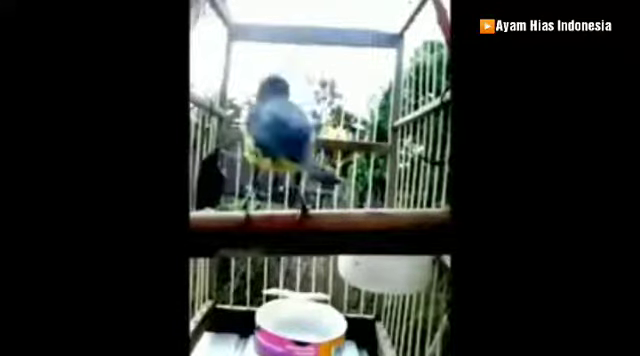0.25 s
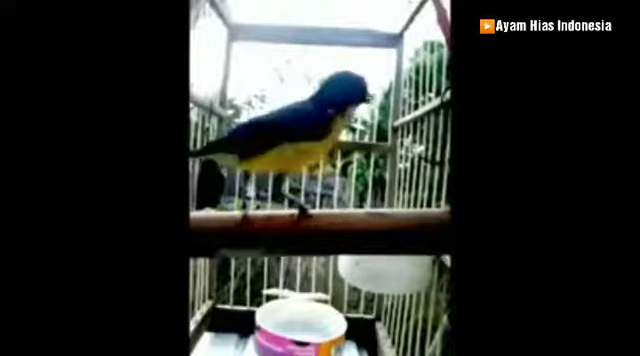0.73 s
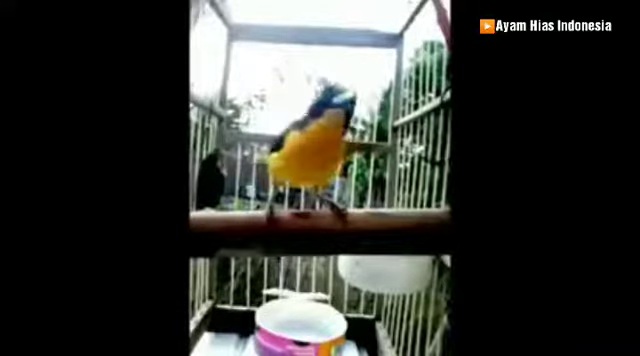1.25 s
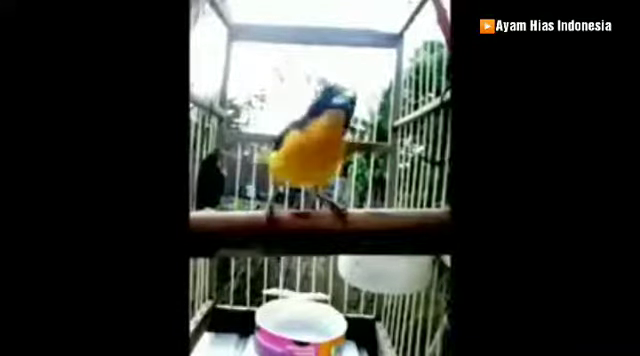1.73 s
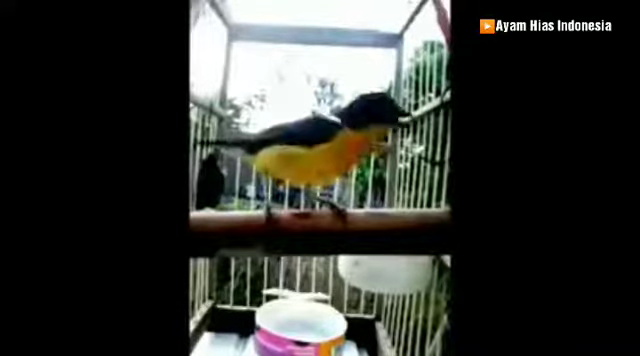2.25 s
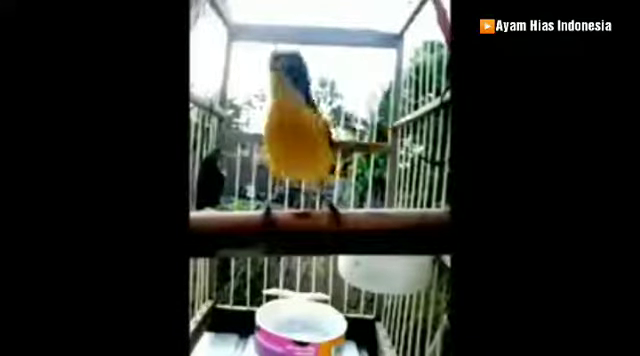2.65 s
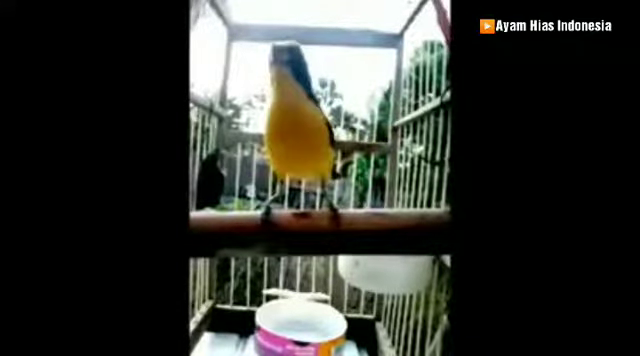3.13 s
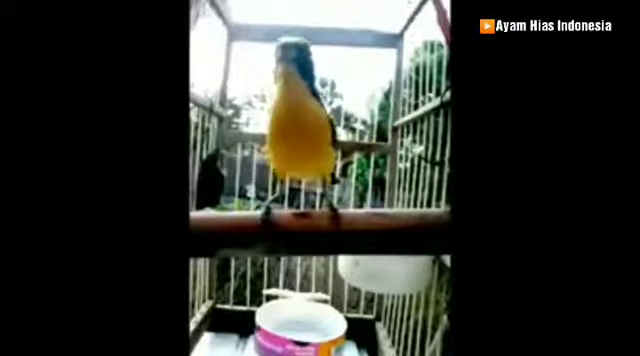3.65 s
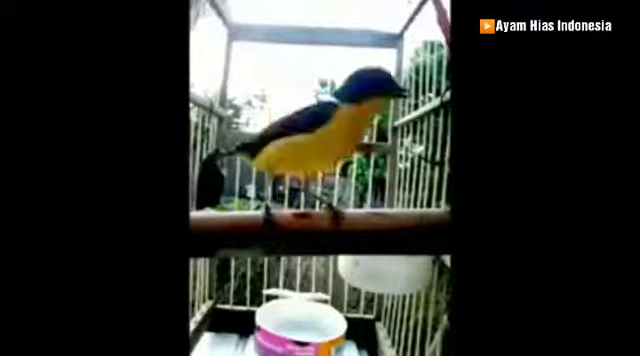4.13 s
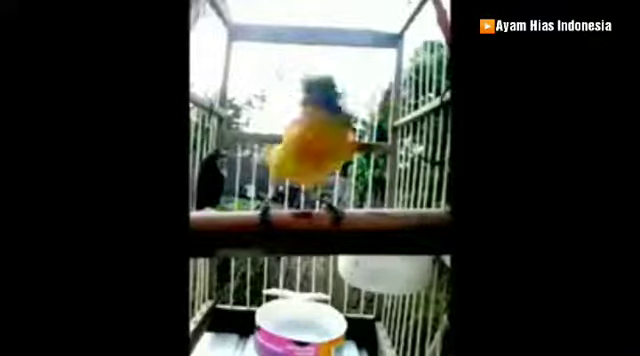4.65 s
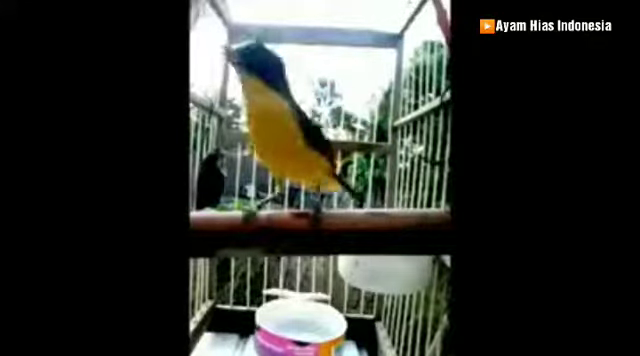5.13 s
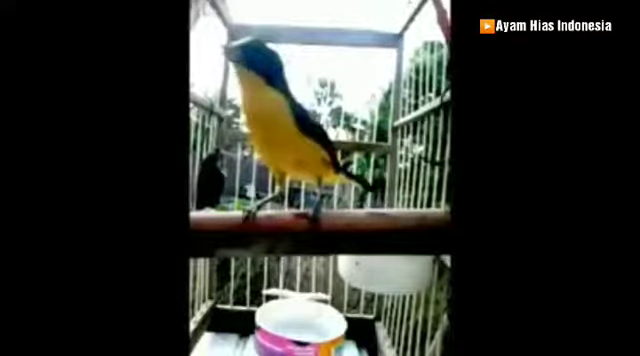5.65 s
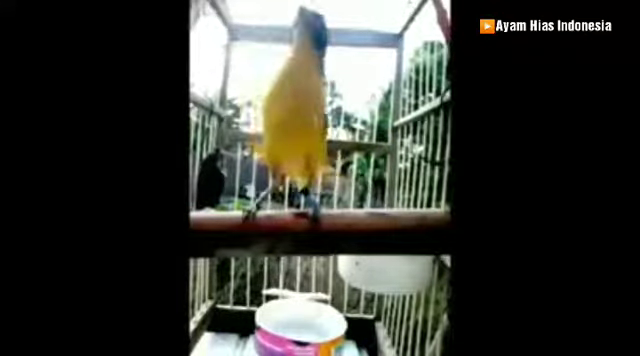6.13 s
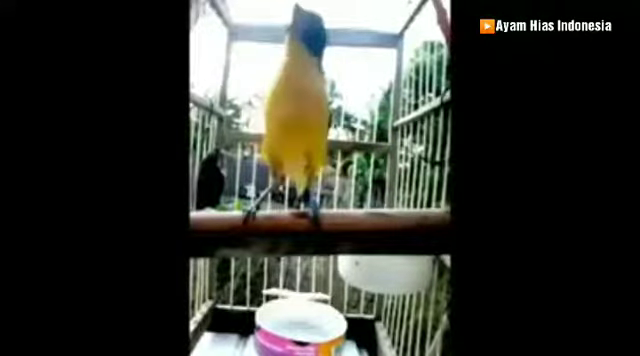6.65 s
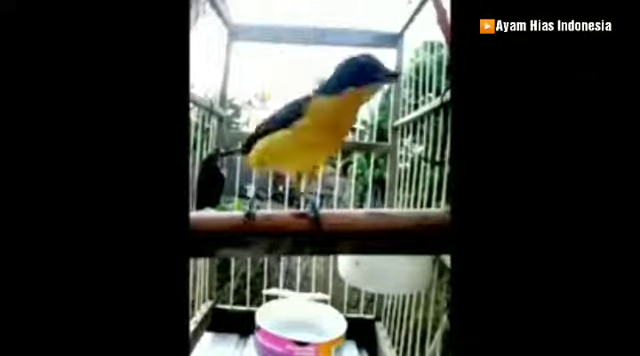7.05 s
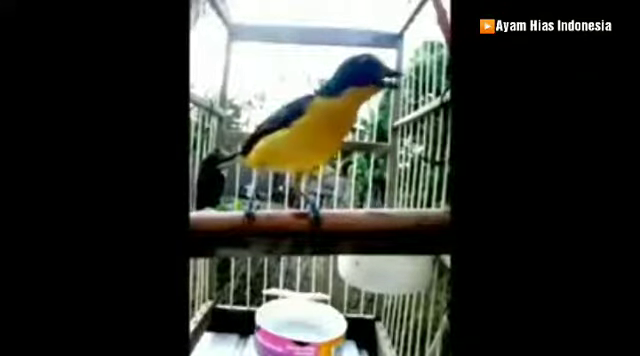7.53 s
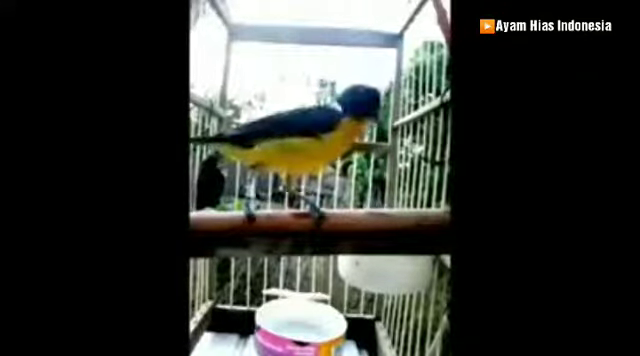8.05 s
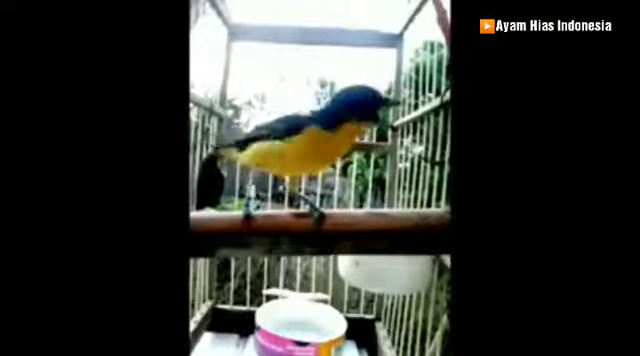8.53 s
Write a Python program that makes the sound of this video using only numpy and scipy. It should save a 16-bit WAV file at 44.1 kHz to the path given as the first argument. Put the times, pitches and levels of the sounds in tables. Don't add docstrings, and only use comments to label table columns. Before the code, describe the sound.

A caged songbird close by sings rapid whistles, arching calls, buzzes, darting peeps and a bright fast trill, distorting on the loudest notes.

```python
import sys
import numpy as np
from scipy import signal
from scipy.fft import rfft, irfft, next_fast_len
from scipy.io import wavfile
from scipy.ndimage import uniform_filter1d, minimum_filter1d

SR = 44100
rng = np.random.default_rng(int(sys.argv[2]) if len(sys.argv) > 2 else 0)


def master_out(mix):
    frames = np.transpose(np.atleast_2d(mix))
    ceiling = np.clip(frames, -1, 1)
    pcm = np.round(ceiling * 32767).astype(np.int16)
    wavfile.write(sys.argv[1], SR, pcm)


def gain_from_db(level_db):
    decades = np.asarray(level_db, float) / 20
    return 10 ** decades


N = 387198
FRAME = 1024

# (start [s], length [s], top pitch [Hz], level [dB])
DUETS = [
    (-.085, 0.11, 6300, -7.5),
    (.118, 0.095, 6250, -9),
    (0.325, .1, 5980, -8),
    (0.465, 0.083, 5850, -7.5),
]
# (share of length, pitch [Hz], level re duet [dB])
DUET_UPPER = [(.35, 5367, -3), (0.52, 5108, -6), (0.721, 5397, -0.5), (1.001, 5546, -10.5)]
# (share of length, pitch [Hz], level re duet [dB])
DUET_LOWER = [(.0, 3588, -23), (.08, 3737, -16), (0.351, 2880, -24), (0.649, 3494, -15.5),
              (1.001, 4420, -21)]
# (share of length, pitch [Hz], level re duet [dB])
DUET_BRANCH = [(0.302, 5760, -3.5), (0.599, 6314, -16)]


def duets():
    notes = []
    for s, length, top_hz, db in DUETS:
        leap = [(0, 5000, -11), (.16, top_hz, -.5)]
        for shape in ([*leap, *DUET_UPPER], DUET_LOWER, DUET_BRANCH):
            notes.append([(s + share * length, hz, db + d) for share, hz, d in shape])
    return [rows for rows in notes if rows[-1][0] > 0]


# (start [s], pitch [Hz], level [dB], dip [dB])
GRACES = [(4.727, 3890, -30.5, -38), (4.88, 3660, -23.5, -45), (5.016, 3890, -24, -36),
          (5.143, 3874, -21, -34.5), (5.297, 3726, -20.5, -25.5), (5.449, 3484, -24.5, -29.5),
          (5.607, 3615, -19.5, -21.5), (5.791, 3850, -22, -32.5), (5.97, 3555, -15.5, -29),
          (6.127, 3740, -20, -31), (6.369, 3532, -20.5, -22)]
# (time [s], pitch [Hz], level [dB])
FEET = [(4.772, 2953, -28.5), (4.932, 3967, -17.5), (5.058, 4076, -12.5), (5.192, 4229, -17),
        (5.343, 4260, -10), (5.497, 3842, -18.5), (5.655, 4150, -16), (5.832, 4213, -22),
        (6.022, 3950, -12.5), (6.178, 3710, -12), (6.43, 3738, -17.5)]
# (top time [s], top [Hz], level [dB], fall [s], end pitch [Hz])
SPIKES = [(4.789, 5913, -10, 0.028, 3900), (4.955, 6086, -10, 0.029, 4076),
          (5.075, 6294, -11.5, .035, 3663), (5.212, 6560, -16, 0.035, 3840),
          (5.362, 6480, -12.5, .029, 3403), (5.523, 6070, -11, 0.022, 3686), (5.68, 5890, -7.5, .025, 3887),
          (5.853, 5845, -10, 0.028, 4340), (6.042, 5873, -10, 0.028, 3144), (6.204, 6140, -12, 0.027, 3885),
          (6.453, 5794, -13.5, 0.031, 4680)]


def spikes():
    notes = []
    for (s, hz, grace_db, dip_db), foot, spike in zip(GRACES, FEET, SPIKES):
        foot_s, foot_hz, foot_db = foot
        top, top_hz, db, fall, end_hz = spike
        notes.append([(s - .0072, hz * .86, grace_db - 25.5),
                      (s + .0024, hz, grace_db),
                      (s + .013, hz * .97, grace_db - 4.5),
                      (s + .029, hz * .85, dip_db)])
        shoulder = (foot_s + .56 * (top - foot_s), foot_hz + .68 * (top_hz - foot_hz), db - 4)
        knee = (top + fall / 2, top_hz + .6 * (end_hz - top_hz), db + .12)
        notes.append([(foot_s - .016, foot_hz * .92, foot_db - 11), foot, shoulder,
                      (top, top_hz, db), knee, (top + fall, end_hz, db - 8)])
    return notes


# (start [s], level [dB])
TRILL = [(6.842, -5.5), (6.872, 5.5), (6.902, -1), (6.938, -4), (6.973, -5), (7.007, -9), (7.042, -6.5),
         (7.076, -2), (7.111, -7.5), (7.147, -9), (7.182, -10)]
# (time [s], from pitch [Hz], to pitch [Hz], length [s])
TRILL_DRIFT = [
    (6.852, 5747, 7050, 0.017),
    (6.953, 5154, 6780, 0.016),
    (7.193, 5157, 6390, .023),
]


def trill():
    s, from_hz, to_hz, length = np.transpose(TRILL_DRIFT)
    return [[(at, np.interp(at, s, from_hz), db),
             (at + np.interp(at, s, length), np.interp(at, s, to_hz), db)] for at, db in TRILL]


# (start [s], length [s], from pitch [Hz], to pitch [Hz], level [dB])
STROKES = [(.463, .009, 3300, 5600, -17), (2.02, 0.14, 1630, 1720, -63), (6.241, 0.0059, 4206, 5810, -11.5),
           (6.568, 0.022, 5267, 7370, -14), (6.582, 0.017, 6500, 5584, -7), (6.598, 0.011, 5330, 6500, -8),
           (6.618, 0.022, 6330, 6485, -8.5), (6.635, 0.02, 8240, 7270, -11),
           (6.663, 0.037, 7200, 7320, -11), (6.744, 0.012, 5604, 7140, -5),
           (6.754, 0.0088, 5910, 6680, -14.5), (6.778, 0.0062, 5766, 6950, -3),
           (6.792, 0.011, 6460, 7850, -6), (6.799, .014, 6135, 6360, -8),
           (6.813, 0.0055, 6150, 7360, -12.5), (7.96, .08, 6756, 5284, -19.5),
           (7.717, .08, 8585, 8545, -28), (7.743, .058, 5174, 5233, -21), (6.752, .07, 7430, 7950, -13.5),
           (7.912, 0.0032, 7605, 6970, 3), (8.347, 0.036, 8100, 7720, -32),
           (8.476, 0.049, 8370, 7420, -49.5), (3.817, 0.027, 5100, 3416, -32.5),
           (6.209, 0.027, 5540, 4660, -14.5)]
# (time [s], pitch [Hz], level [dB])
SWOOP = [
    (7.885, 8600, -20.5),
    (7.93, 7160, -15.5),
    (7.97, 5933, -18.5),
    (8.05, 4116, -27),
]


def glides():
    strokes = [[(s, a, db), (s + length, b, db)] for s, length, a, b, db in STROKES]
    return [SWOOP, *strokes]


def whistles():
    out = np.zeros(N)
    for rows in duets() + spikes() + trill() + glides():
        at, phase, envelope, hz, _ = note(rows, fade_s=.0024)
        tone = np.exp(1j * phase) * (1 + np.sqrt(.0036) * flutter(len(at), hz=422))
        envelope = envelope * gain_from_db(4.5 * flutter(len(at), hz=72).real)
        out[at] += envelope * (tone + gain_from_db(-30) * tone ** 2 + gain_from_db(-42) * tone ** 3).imag
    return out


# (start [s], settle [s], end [s], from pitch [Hz], level [dB])
ARCHES = [
    (.824, .897, 1.052, 1160, -10.5),
    (1.345, 1.372, 1.529, 3150, -10.5),
    (2.085, 2.155, 2.357, 1270, -11.5),
]
# (share of time, share of the pitch climb, level re arch [dB])
CLIMB = [(.0, .0, -18), (.24, .31, -4.5), (.47, 0.82, -8.5), (.72, 0.92, -8.5)]
# (time before end [s], pitch [Hz], level re arch [dB], throat [Hz])
DROP = [(.115, 3428, -1.5, 2800), (.065, 3360, -2.5, 1900), (0.024, 3290, -5, 4400),
        (.014, 3500, -6.5, 3400), (0.01, 2200, -5, 5250), (0.00061, 1500, -9, 3300)]
ARCH_TUNE = (.99, 1.005, 0.95)
ARCH_FADE_DB = (0.5, 0, -5)


def arches():
    notes, crown_hz = [], 3360
    voice = (.0004, 16.8, .24)   # roughness, fall dB per octave, extra dB of the fundamental
    for (s, settle, end, hz, db), tune, fade_db in zip(ARCHES, ARCH_TUNE, ARCH_FADE_DB):
        rows = [(s + a * (settle - s), hz + b * (crown_hz - hz), db + d, 5100) for a, b, d in CLIMB]
        rows.append((settle, 3297, db - 9, crown_hz))
        for before, drop_hz, d, throat_hz in DROP:
            change_db = fade_db * min(1, 2 - 2 * before / DROP[0][0])
            rows.append((end - before, drop_hz * tune, db + d + change_db, throat_hz))
        notes.append((rows, voice))
    return notes


# (start [s], end [s], from pitch [Hz], to pitch [Hz], level [dB])
RAMPS = [
    (3.064, 3.212, 1440, 2182, -23.5),
    (3.328, 3.387, 1650, 2105, -27),
    (3.505, 3.541, 1767, 2094, -28.5),
    (3.671, 3.737, 1820, 2050, -28),
    (3.899, 3.955, 1800, 2207, -27.5),
    (4.088, 4.141, 1616, 2166, -29),
]
# (crest time [s], end [s], crest pitch [Hz], end pitch [Hz], level [dB])
CRESTS = [
    (3.246, 3.248, 2987, 2880, -16),
    (3.418, 3.446, 2994, 2585, -10),
    (3.573, 3.604, 2810, 2667, -13.5),
    (3.768, 3.83, 2740, 2494, -19),
    (3.973, 4.016, 2940, 2503, -14.5),
    (4.172, 4.203, 2700, 2520, -15),
]


def hooks():
    notes = []
    voice = (.014, 10.3, -5.5)   # roughness, fall dB per octave, extra dB of the fundamental
    for (s, flip, a, b, ramp_db), (top, end, top_hz, end_hz, db) in zip(RAMPS, CRESTS):
        middle_hz = a + .63 * (b - a)
        fade = max(top + .002, end - .027)
        fade_hz = np.interp(fade, [top, end], [top_hz, end_hz])
        ramp = [(s, a, ramp_db - 4, a * 1.43),
                ((s + flip) / 2, middle_hz, ramp_db - .5, middle_hz * 1.69),
                (flip, b, ramp_db, b * 1.69)]
        crest = [(top - .012, (b + top_hz) / 2, ramp_db - 10, top_hz),
                 (top, top_hz, db, top_hz),
                 (fade, fade_hz, db - 4.5, top_hz),
                 (end, end_hz, db - 14.5, top_hz)]
        notes.append((ramp + crest, voice))
    return notes


# (start [s], end [s], from pitch [Hz], to pitch [Hz], level [dB])
CHIRPS = [
    (1.304, 1.35, 1321, 1415, -11.5),
    (2.493, 2.552, 1651, 1923, -7.5),
    (2.555, 2.754, 1863, 1674, -21),
    (2.829, 2.933, 1435, 1843, -15.5),
    (2.93, 2.994, 1783, 1717, -18.5),
    (7.331, 7.366, 1636, 1440, -25.5),
    (8.316, 8.382, 1384, 1377, -13.5),
    (8.411, 8.454, 1667, 1489, -10.5),
]
# (throat re pitch [ratio], share of length at the loudest point, roughness [0-1],
# fall [dB per octave], extra level of the fundamental [dB])
CHIRP_VOICES = [(4.0, 0.67, .12, 25.5, 12.5), (2.9, .55, 0, 25, 11.5), (3.3, 0.06, .12, 12, 2),
                (1.95, 0.7, 0, 11.5, -5), (3.0, 0.47, 0.12, 8.5, -7.5), (1.3, 0.39, 0.51, 3.5, 6),
                (6.2, 0.27, 0.03, 35, -7), (5.3, 0.5, 0.04, 31, -11)]
# (after the attack [dB], at the end [dB])
CHIRP_SWELLS = [(-3.5, 1), (-12.5, 0.5), (-6.5, -6.5), (-19.5, 0), (-2.5, -20.5), (-7.5, -19), (-7, -23),
                (-6.5, -22)]


def chirps():
    notes = []
    for chirp, chirp_voice, (early_db, end_db) in zip(CHIRPS, CHIRP_VOICES, CHIRP_SWELLS):
        s, end, a, b, db = chirp
        throat, share, *voice = chirp_voice
        length = end - s
        at = np.array([0, .0013 / length, share / 2 + .068, share + .001, 1])
        level_db = np.interp(at, np.delete(at, 2), [-30, early_db, 0, end_db])
        hz = a + (b - a) * at ** .82
        rows = sorted(zip(s + at * length, hz, db + level_db, throat * hz))
        notes.append((rows, voice))
    return notes


# (time [s], pitch [Hz], level [dB], throat [Hz])
WARBLE = [(4.285, 1443, -30.5, 3380), (4.311, 1881, -27, 4240), (4.343, 2072, -24, 4400),
          (4.366, 2853, -22.5, 4780), (4.411, 2940, -24.5, 4570), (4.448, 1830, -26, 5430),
          (4.489, 1448, -25, 4850)]
# (time [s], pitch [Hz], level [dB], throat [Hz])
WARBLE_AGAIN = [(4.49, 1439, -22.5, 4560), (4.527, 1750, -21, 4800), (4.565, 3600, -24, 3690),
                (4.6, 2617, -16.5, 5450), (4.64, 1971, -21.5, 5000), (4.67, 1603, -30, 4490)]
# (time [s], pitch [Hz], level [dB], throat [Hz])
RISING_RASP = [(7.459, 3460, -39, 6740), (7.52, 2922, -20, 7300), (7.54, 3133, -28.5, 7280),
               (7.6, 3700, -17, 7290), (7.7, 4533, -18.5, 9280), (7.75, 5100, -18, 6640),
               (7.799, 5034, -20.5, 6200), (7.81, 5370, -37, 6470)]
# (time [s], pitch [Hz], level [dB], throat [Hz])
LAST_RASP = [(8.545, 1346, -36, 4724), (8.581, 1974, -29.5, 5590), (8.637, 1419, -16.5, 7210),
             (8.701, 1549, -25, 7820), (8.78, 1851, -22.5, 7570)]
# (time [s], pitch [Hz], level [dB], throat [Hz])
SOFT_CALL = [(8.156, 1158, -44.5, 4600), (8.18, 1335, -36.5, 4970), (8.208, 1302, -34, 4790),
             (8.243, 1085, -47.5, 4350)]
# (roughness [0-1], fall [dB per octave], extra level of the fundamental [dB])
LONG_VOICES = [
    (.07, 12, 0),
    (0.07, 16, -7),
    (0.55, 5.5, -4.5),
    (.62, 14.5, 10),
    (0.05, 16.5, 29.5),
]


def warble_and_rasps():
    return list(zip([WARBLE, WARBLE_AGAIN, RISING_RASP, LAST_RASP, SOFT_CALL], LONG_VOICES))


def overtone_notes():
    out = np.zeros(N)
    for rows, (rough, slope_db, first_db) in warble_and_rasps() + arches() + hooks() + chirps():
        at, phase, envelope, hz, (throat_hz,) = note(rows, fade_s=.004)
        harsh = rough > .5
        if harsh:
            order = np.arange(1, 25000 // hz.min()) / 2
        else:
            order = np.arange(1, 16000 // hz.min() + 1)
        order = order[:, None]
        half_step = order % 1
        octaves = np.log2(order * hz / throat_hz)
        fall_db = slope_db * np.maximum(-octaves, 2.166 * octaves) - first_db * (order == 1)
        gains = (gain_from_db(-fall_db) + gain_from_db(-56)) * (order * hz < 16000)
        gains = gains * np.where(half_step, np.clip(1.75 - hz / 2600, 0, 1), 1)
        gains = gains * np.where(order < 1, np.clip(3 - hz / 1300, 0, 1) * (hz.min() > 2000), 1)
        gains = gains * np.where(order * hz > 11800, gain_from_db(-11.5), 1)
        gains = gains / np.sqrt(np.sum(gains ** 2, axis=0))
        share = np.clip(rough * order ** 2 + 2 * half_step, 0, 1)
        spread_hz = 600 * min(hz.mean(), 2500) / 3600 if harsh else 220
        jitter = [flutter(len(at), spread_hz * np.sqrt(k) * min(k, 1)) for k in order[:, 0]]
        shake = np.sqrt(1 - share) + np.sqrt(share) * np.array(jitter)
        out[at] += envelope * np.sum(gains * shake * np.exp(1j * order * phase), axis=0).imag
    return out * throbs()


# (time [s], level [dB])
THROBS = [(2.559, 6.5), (2.575, 5.5), (2.591, -8.5), (2.608, 6), (2.623, 9), (2.637, -1.5), (2.655, -0.5),
          (2.67, 10), (2.682, 7), (2.696, 1), (2.712, 7), (2.724, 9), (2.745, -5.5), (2.934, 3.5),
          (2.946, 5), (2.963, 6.5), (2.974, 3), (7.592, 5.5), (7.602, 4), (7.614, 3), (7.622, 5),
          (7.659, 3), (7.669, 1), (7.681, 3), (7.689, 0), (7.705, 5.5), (7.714, -1.5)]
# (from [s], to [s])
BUZZING = [
    (2.553, 2.77),
    (2.925, 3.0),
    (7.585, 7.725),
]


def throbs():
    t = np.arange(N) / SR
    swells = gain_from_db(-6) + sum(gain_from_db(db) * np.exp(-.5 * ((t - s) / .002) ** 2) for s, db in THROBS)
    return np.where(within(BUZZING), swells, 1)


def note(rows, fade_s):
    s, *columns = np.transpose(rows)
    at = np.arange(max(0, int((s[0] - fade_s) * SR)), min(N, int((s[-1] + fade_s) * SR)))
    t = at / SR
    hz, level_db, *rest = [uniform_filter1d(np.interp(t, s, c), size=88) for c in columns]
    edge = np.clip(np.minimum(t - s[0], s[-1] - t) / (2 * fade_s) + .5, 0, 1)
    return at, 2 * np.pi * np.cumsum(hz) / SR, np.sqrt(2) * gain_from_db(level_db) * edge ** 2, hz, rest


def flutter(size, hz):
    real, imag = rng.standard_normal((2, size + 500))
    low_pass = signal.butter(4, hz, fs=SR, output="sos")
    return rms_one(signal.sosfilt(low_pass, real + 1j * imag)[500:])


def rms_one(x):
    return x / np.sqrt(np.mean(np.abs(x) ** 2) + 1e-20)


def within(spans):
    t = np.arange(N) / SR
    return np.any([(t > a) & (t < b) for a, b in spans], axis=0)


def band_pass(x, low_hz, high_hz):
    return signal.sosfilt(signal.butter(2, [low_hz, high_hz], "band", fs=SR, output="sos"), x)


# (from [s], to [s])
BREATHY = [
    (.32, .55),
    (6.36, 6.47),
    (6.585, 6.7),
    (6.74, 7.13),
]


def air(bird):
    effort = uniform_filter1d(np.abs(bird), size=1100)
    low = rms_one(band_pass(rng.standard_normal(N), 2546, 8200))
    high = rms_one(band_pass(rng.standard_normal(N), 8700, 9700))
    breath = rms_one(band_pass(rng.standard_normal(N), 1740, 3000))
    return effort * (gain_from_db(-35) * low + gain_from_db(-46) * high + gain_from_db(-40) * within(BREATHY) * breath)


# (time [s], length [s], pitch [Hz], # level [dB])
FAINT_SWELLS = [(.43, .046, 260, -64), (7.308, .069, 159, -61), (7.68, .15, 195, -49.5),
                (1.717, .098, 3985, -67.5), (3.204, .092, 904, -60.5), (3.753, .14, 910, -56),
                (.9, .12, 1150, -56), (3.4, .04, 1000, -60), (3.57, .12, 880, -64), (6.63, .07, 900, -56),
                (8.35, .06, 950, -62), (8.27, .05, 650, -64), (8.31, .07, 2950, -41), (8.4, .065, 3000, -41),
                (8.41, .055, 1800, -46)]


def faint_swells():
    out = np.zeros(N)
    for s, length, hz, level_db in FAINT_SWELLS:
        t = np.arange(int(length * SR)) / SR
        ring = (np.exp(2j * np.pi * hz * t) * flutter(len(t), hz=25.2)).real
        out[int(s * SR) + np.arange(len(t))] += gain_from_db(level_db) * np.sin(np.pi * t / length) * ring
    return out


def yard(x):
    t = np.arange(int(.5 * SR)) / SR
    tail = rng.standard_normal(len(t)) * gain_from_db(-60 * t / .18) * (t > .008)
    tail = band_pass(tail, 2500, 6500)
    return signal.fftconvolve(x, tail / np.sqrt(np.sum(tail ** 2)))[:N]


def scene():
    bird = whistles() + overtone_notes()
    bird = signal.sosfilt(signal.butter(6, 1000, "high", fs=SR, output="sos"), bird + air(bird))
    hiss = gain_from_db(-100) * signal.lfilter([.2], [1, -.8], rng.standard_normal(N))
    return np.tile(bird + gain_from_db(-29) * yard(bird) + faint_swells() + hiss, (2, 1))


# (band of 16 lines, extra level needed to be kept [dB])
STARVED = [
    (6, 3),
    (7, 8),
    (18, 10),
    (19, 20),
]


def smear(x, noise_db, mask_db, swap_db, uneven_db, holes_db):
    frames = dict(nperseg=2 * FRAME, noverlap=FRAME, window="cosine")
    z = signal.stft(x, **frames)[2]
    line = np.arange(FRAME + 1)
    band = line // 16

    def by_band(v):
        sums = np.add.reduceat(v, np.arange(0, FRAME + 1, 16))
        return np.repeat(sums / 16, 16, axis=0)[:FRAME + 1]

    power = by_band(np.abs(z) ** 2)
    loudest = power.max(axis=0)
    typical = np.exp(by_band(np.log(np.abs(z) + 1e-12)))
    steady = power > 12 * typical ** 2
    typical = np.maximum(typical, uniform_filter1d(typical, size=57, axis=0))
    noise = rng.standard_normal(z.shape) + 1j * rng.standard_normal(z.shape)
    need_db = np.full(FRAME + 1, float(mask_db))
    for k, extra_db in STARVED:
        need_db[band == k] += extra_db
    swap_luck, level_luck, hole_luck = rng.standard_normal((3, band[-1] + 1, z.shape[1]))[:, band]
    lasting = np.sqrt(3) * uniform_filter1d(hole_luck, size=3, axis=1)
    swap_below = gain_from_db(swap_db - 13 * (band < 13))[:, None] ** 2 * loudest
    swapped = (power * gain_from_db(8 * swap_luck) ** 2 < swap_below) & (band > 3)[:, None] & ~steady
    z = np.where(swapped, np.sqrt(power / 2) * noise[::-1], z) * gain_from_db(uneven_db * level_luck * ~steady)
    kept = power > gain_from_db(need_db[:, None] + holes_db * lasting) ** 2 * loudest
    kept |= steady & (power > gain_from_db(mask_db) ** 2 * loudest)
    kept |= line[:, None] < 14
    return signal.istft((z + gain_from_db(noise_db) * typical * noise) * kept, **frames)[1][:N]


TILES = [(20, 21, 12), (21, 23, 12), (23, 25, 12), (25, 27, 15), (27, 29, 15), (29, 31, 15), (31, 33, 15),
         (33, 35, 21), (35, 38, 21), (38, 42, 26), (42, 46, 30), (19, 20, 12)]
TILE_DB = [2, 4.5, 3.5, -1.5, 3.5, 1, 2, -4, -8, 0, -16.5, -25]


def rebuild_treble(x, smeared):
    size = 128 * next_fast_len(N // 128 + 1)
    step = size // 128
    bands = np.arange(size // 2 + 1) / step
    true = rfft(x, size)
    low = rfft(smeared, size) * np.clip((TILES[0][0] + .033 - bands) / 1.5, 0, 1)
    white = rfft(rng.standard_normal(size))
    out = irfft(low)[:N]
    for (a, b, shift), tile_db in zip(TILES, TILE_DB):
        window = np.clip((np.minimum(bands - a, b - bands) + .2) / .37, 0, 1) ** 2
        copy = irfft(np.roll(low, shift * step) * window)[:N]
        grain = copy / frame_rms(copy) + gain_from_db(-8) * rms_one(irfft(white * window)[:N])
        tone = np.sqrt(2) * np.sin(np.pi * ((a + b) // 2 + .5) / 64 * np.arange(N))
        tile = irfft(true * window)[:N]
        loudness = uniform_filter1d(np.abs(tile), size=256)
        recent = -minimum_filter1d(-loudness, size=FRAME + 1, origin=FRAME // 2)
        level = np.minimum(frame_rms(tile), 6.8 * recent + 1e-9)
        level = level * np.clip(level / frame_rms(x) / gain_from_db(-57.5), 0, 1)
        held = held_tone(a)
        out += gain_from_db(tile_db) * level * grain * np.where(held > 0, gain_from_db(-2.5), 1) + held * tone
    return out


def frame_rms(x):
    held = np.sqrt(np.add.reduceat(x ** 2, np.arange(0, N, FRAME)) / FRAME)
    return uniform_filter1d(np.repeat(held, FRAME)[:N], size=128) + 1e-9


# (low edge of the tile [SR / 128], from [s], to [s], level [dB])
HELD_TONES = [(27, 0.104, 0.226, -51.5), (25, 0.11, 0.215, -48.3), (31, 0.128, 0.221, -50.8),
              (21, 0.134, 0.203, -39.6), (29, 0.348, 0.412, -46.2), (27, 0.354, 0.43, -49.3),
              (27, 0.459, 0.482, -39.5), (35, 0.464, 0.563, -49.5), (29, 0.464, 0.511, -50.4),
              (38, 0.47, 0.511, -52.5), (38, 0.522, 0.569, -48.2), (29, 0.522, 0.551, -43.4),
              (29, 0.929, 1.004, -46.2), (38, 1.3, 1.538, -55.9), (29, 1.312, 1.515, -51.5),
              (33, 1.312, 1.376, -52.2), (27, 1.492, 1.527, -46.9), (19, .865, 1.04, -36),
              (29, 2.119, 2.252, -52.3), (23, 2.136, 2.188, -46.7), (29, 2.264, 2.293, -45.3),
              (29, 2.49, 2.56, -52.2), (31, 2.502, 2.705, -46.9), (35, 2.508, 2.752, -47.9),
              (27, 2.531, 2.572, -48.3), (23, 2.548, 2.566, -42.8), (29, 2.612, 2.664, -50.0),
              (25, 2.63, 2.752, -37.4), (23, 2.664, 2.688, -32.3), (27, 2.67, 2.74, -39.2),
              (29, 2.676, 2.728, -46.9), (25, 2.891, 2.978, -48.5), (27, 2.92, 2.984, -46.7),
              (27, 3.14, 3.175, -48.1), (31, 3.181, 3.222, -46.2), (21, 3.721, 3.855, -50.2),
              (21, 3.889, 4.034, -50.7), (25, 4.307, 4.429, -49.9), (27, 4.54, 4.621, -50.0),
              (20, 5.05, 5.12, -40.0), (31, 5.056, 5.097, -49.6), (21, 5.062, 5.207, -49.8),
              (31, 5.213, 5.248, -49.0), (21, 5.219, 5.404, -47.4),
              (21, 5.445, 5.561, -46.0), (19, 5.69, 5.91, -40), (21, 5.608, 5.677, -47.7),
             (31, 5.671, 5.706, -47.4), (38, 5.677, 5.712, -47.3), (19, 5.96, 6.1, -42),
             (21, 6.02, 6.095, -46.6), (38, 6.177, 6.24, -51.0), (21, 6.177, 6.252, -46.4),
             (25, 6.211, 6.252, -45.4), (29, 6.583, 6.635, -49.4), (38, 6.641, 6.705, -48.4),
             (38, 6.716, 6.931, -52.3), (23, 6.78, 6.798, -20.4), (20, 6.844, 6.891, -13.8),
             (35, 6.844, 6.954, -52.7), (33, 6.85, 6.937, -52.1), (20, 6.902, 6.92, -14.6),
             (27, 6.925, 7.21, -53.5), (20, 6.972, 6.995, -18.3), (38, 6.978, 7.012, -51.4),
             (20, 7.007, 7.036, -37.2), (20, 7.047, 7.076, -43.8), (25, 7.564, 7.593, -34.0),
             (31, 7.564, 7.581, -40.6), (23, 7.57, 7.587, -29.8), (31, 7.593, 7.814, -42.9),
             (33, 7.593, 7.674, -52.0), (27, 8.313, 8.33, -24.5), (31, 8.313, 8.377, -33.4),
             (31, 8.417, 8.464, -23.0), (29, 8.417, 8.452, -22.2), (29, 8.464, 8.51, -50.5),
             (35, 8.568, 8.696, -44.2), (31, 8.568, 8.644, -45.6), (25, 8.626, 8.777, -33.8),
             (29, 8.638, 8.702, -41.8), (31, 8.655, 8.678, -35.8), (31, 8.69, 8.725, -50.2),
             (29, 8.742, 8.771, -47.2)]


def held_tone(edge):
    level = np.zeros(N)
    for a, start, end, db in HELD_TONES:
        level[int(start * SR):int(end * SR)] += gain_from_db(db) * (a == edge)
    return uniform_filter1d(level, size=200)


def peak_level(x, size, origin=0):
    return uniform_filter1d(-minimum_filter1d(-np.abs(x), size=size, origin=origin), size=200)


def band_limit(x):
    return signal.sosfilt(signal.butter(12, 15900, fs=SR, output="sos"), x)


# (from [s], to [s])
QUICK = [
    (1.27, 1.31),
    (2.06, 2.1),
    (2.49, 2.74),
    (2.83, 2.985),
    (6.54, 6.59),
    (6.72, 7.215),
    (7.86, 7.91),
    (8.29, 8.33),
    (8.39, 8.425),
]
# (from [s], to [s])
OVERLOAD = [
    (5.665, 5.669),
    (5.843, 5.847),
    (6.744, 6.75),
    (6.772, 6.784),
    (6.868, 6.878),
    (6.905, 6.916),
    (6.975, 6.985),
    (7.9, 7.91),
]


def record(dry):
    clean = dry[0]
    smeared = smear(clean, noise_db=-7.0, mask_db=-51.0, swap_db=-13.5, uneven_db=4.5, holes_db=6.0)
    error = smeared - clean
    near = peak_level(clean, 2 * FRAME + 1, FRAME - 300)
    error_level = uniform_filter1d(np.abs(error), size=200) + 1e-9
    smeared -= error * (1 - np.clip(gain_from_db(-1.5) * near / error_level, 0, 1))
    high_pass = signal.butter(2, 3800, "high", fs=SR, output="sos")
    quick = uniform_filter1d(within(QUICK) * 1., size=256)
    smeared += .88 * quick * signal.sosfiltfilt(high_pass, clean - smeared)
    mid = rebuild_treble(clean, smeared)
    ceiling = .93 + .24 * within(OVERLOAD)
    mid = mid * np.minimum(1, ceiling / (peak_level(mid, 400) + 1e-9))
    residue = smear(mid, noise_db=-2.0, mask_db=-76.5, swap_db=-81.5, uneven_db=.5, holes_db=.5) - mid
    side = gain_from_db(-21) * residue + gain_from_db(-21.5) * np.roll(mid, FRAME // 8)
    mix = np.clip([mid + side, mid - side], -1, 1)
    return band_limit(mix)


dry = scene()
out = record(dry)
master_out(out)
```